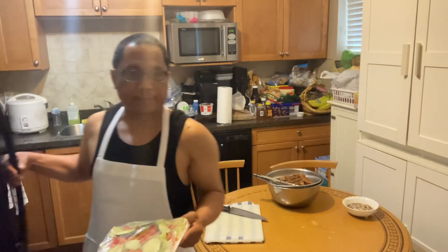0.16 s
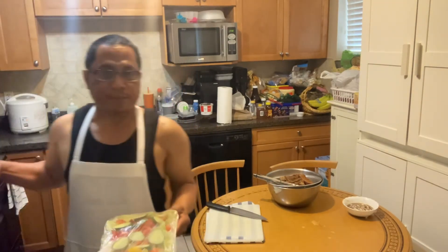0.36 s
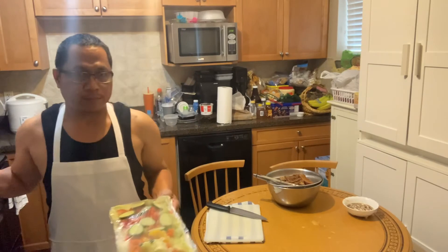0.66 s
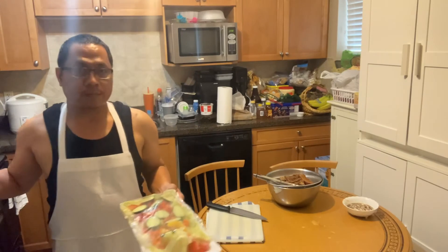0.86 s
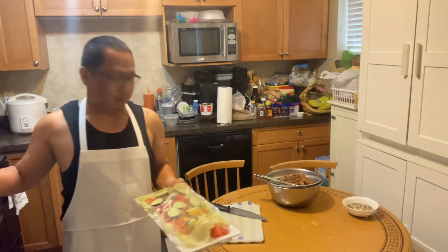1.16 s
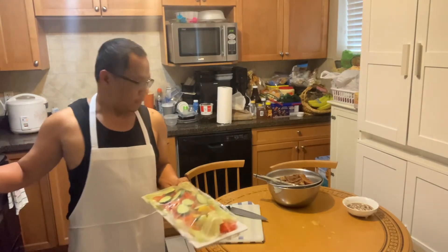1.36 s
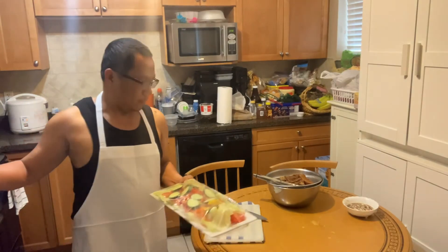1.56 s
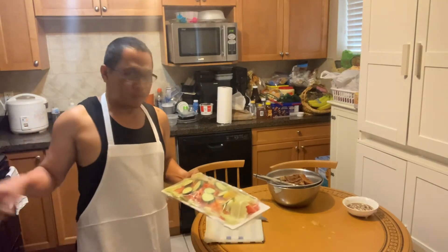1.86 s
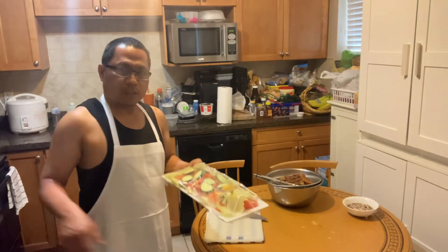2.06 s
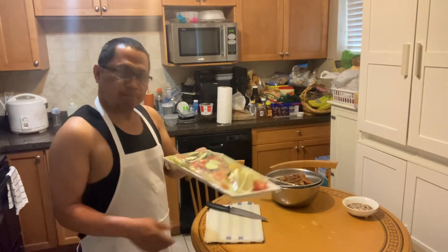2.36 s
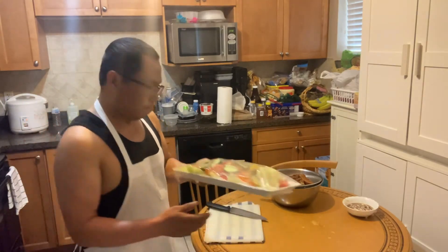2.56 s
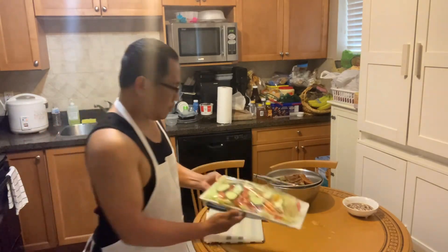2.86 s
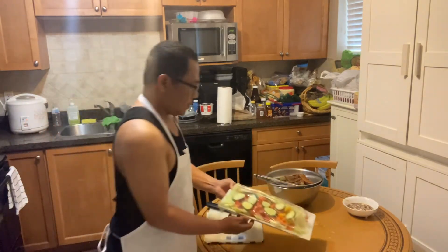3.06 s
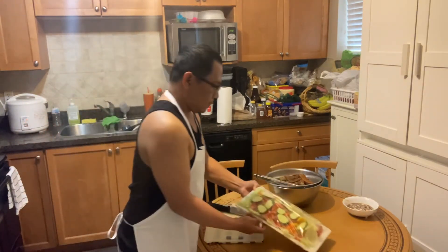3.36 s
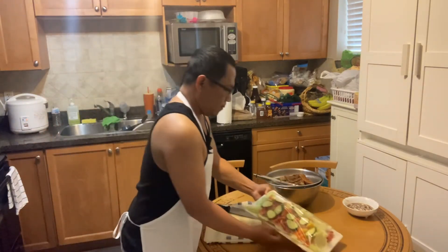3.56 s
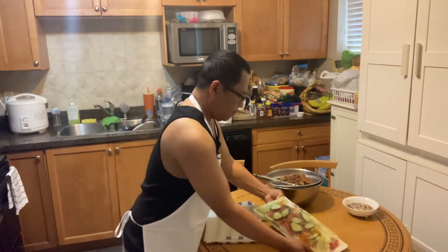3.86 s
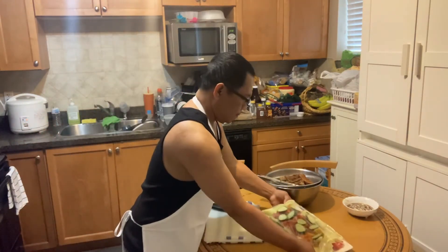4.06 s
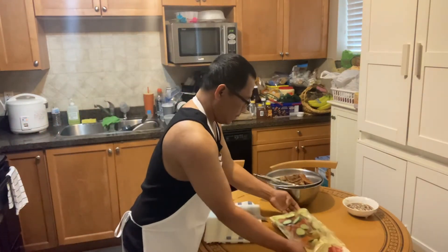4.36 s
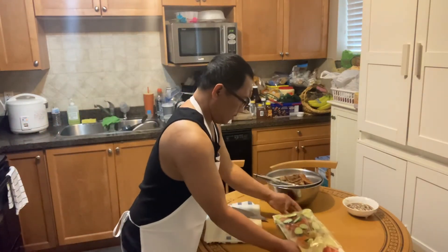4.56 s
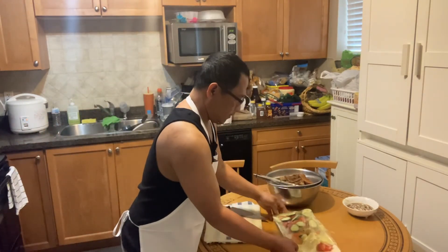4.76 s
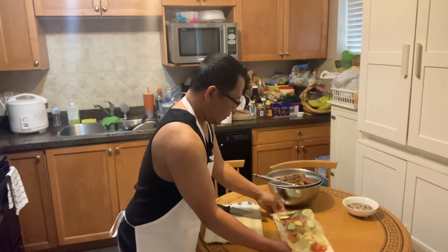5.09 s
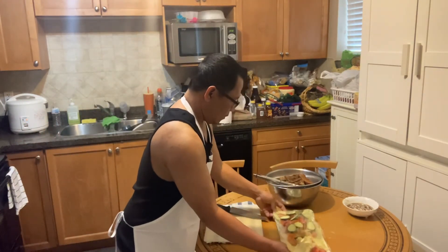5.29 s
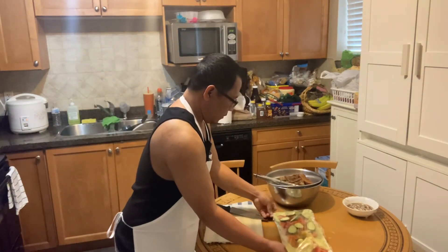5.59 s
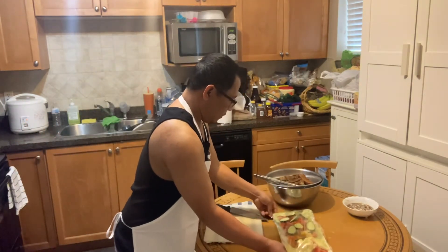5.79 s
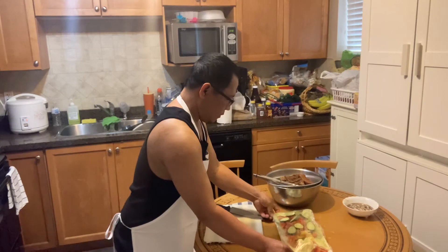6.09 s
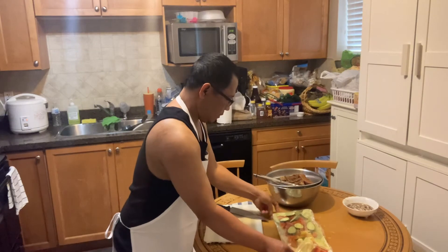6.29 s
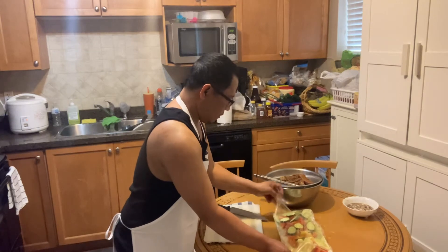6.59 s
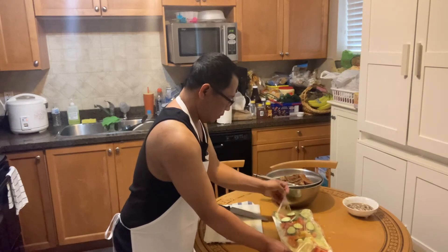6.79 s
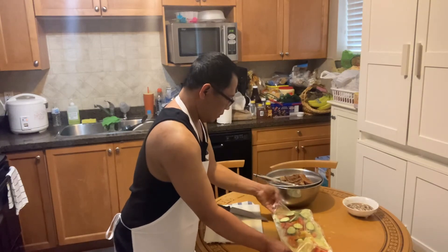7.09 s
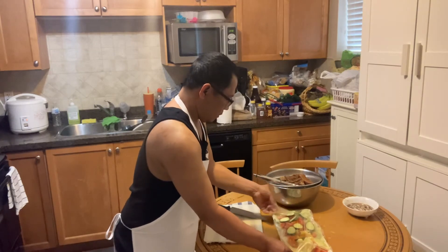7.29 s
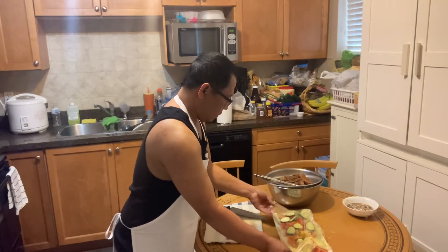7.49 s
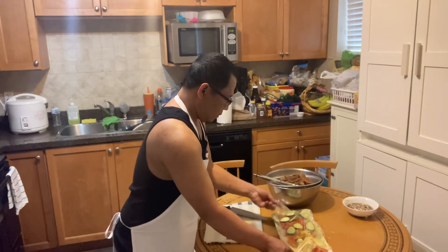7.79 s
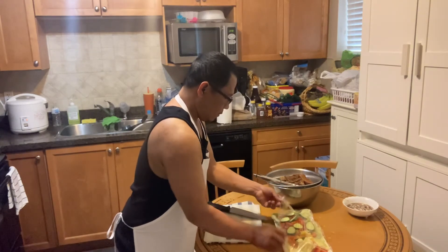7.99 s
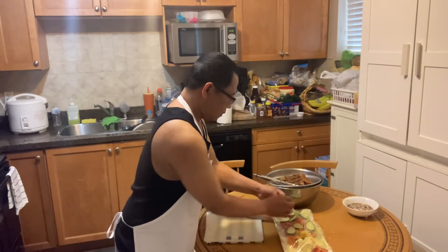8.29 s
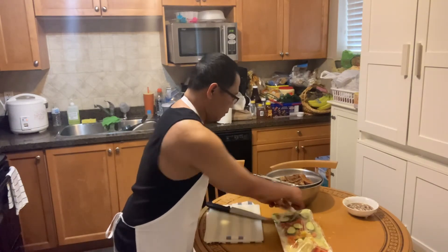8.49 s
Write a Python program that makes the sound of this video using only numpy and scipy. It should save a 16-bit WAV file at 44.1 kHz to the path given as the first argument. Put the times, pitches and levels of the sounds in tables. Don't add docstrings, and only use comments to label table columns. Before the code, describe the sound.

In a small kitchen with a humming fridge, a door thumps closed, a plate lands and drags on wood, and cling film crackles sharply.

```python
import sys
import numpy as np
from scipy import signal
from scipy.fft import rfft, irfft, next_fast_len
from scipy.io import wavfile

SR = 44100
rng = np.random.default_rng(int(sys.argv[2]) if len(sys.argv) > 2 else 0)


def magnitude_from_level(level_db):
    exponent = np.asarray(level_db, float) / 20
    return 10 ** exponent


def dump(signal):
    limited = np.clip(np.atleast_2d(signal).T, -1, 1)
    pcm = np.round(limited * 32767).astype(np.int16)
    wavfile.write(sys.argv[1], SR, pcm)


N = 381024
COARSE_S = np.arange(0, N + 40, 40) / SR

# frequency in Hz, left-right correlation from 0 to 1.
LIKENESS = [(40, 0.96), (130, 1), (290, 0.83), (640, 0.45), (1400, 0.22), (3000, 0.0096), (4200, 0.45),
            (8000, .1)]
TABLE_HZ = [145, 361, 415, 503, 603, 646, 746, 830, 1090, 1198, 1365, 1420, 1880, 2237, 2365, 2900, 3720]
# level in dB, t60 in s.
KNOCK_RING = [(-21, .4), (0, 0.39), (-12, 0.41), (-21.5, 0.81), (-12.5, 0.36), (-19, 0.5), (-11, 0.4),
              (-1, 0.1), (-12, 0.16), (0, 0.22), (-14, 0.3), (-9, 0.25), (-13, 0.14), (-30, 0.44),
              (-24, 0.31), (-35.5, .15), (-33, 0.27)]


def at_hz(points, hz):
    table = np.array(points)
    return np.interp(np.log(hz), np.log(table[:, 0]), table[:, 1])


def rms_one(x):
    return x / np.sqrt(np.mean(x ** 2) + 1e-20)


def smooth(coarse):
    return np.interp(np.arange(N) / SR, COARSE_S, coarse)


def drift(rate):
    r = np.exp(-80 * np.pi * rate / SR)
    white = rng.standard_normal(len(COARSE_S) + 2000)
    return rms_one(signal.lfilter([1], [1, -2 * r, r * r], white)[2000:])


def spread(mid_side, hz):
    alike = np.clip(at_hz(LIKENESS, hz), 0, 1)
    mid = np.sqrt((1 + alike) / 2) * mid_side[0]
    side = np.sqrt((1 - alike) / 2) * mid_side[1]
    return mid + side * [[1], [-1]]


def noise_bank():
    centres_hz = 35 * 2 ** np.arange(0, 9, .42)
    size = next_fast_len(N)
    white = rfft(rng.standard_normal((2, size)))
    bin_hz = np.arange(1, white.shape[1] + 1) * SR / size
    place = np.interp(np.log(bin_hz), np.log(centres_hz), range(len(centres_hz)))
    bank = []
    for k, hz in enumerate(centres_hz):
        weight = np.clip(1 - np.abs(place - k), 0, 1)
        bank.append((hz, spread(irfft(white * weight, size)[:, :N], hz)))
    return bank


def resonate(x, hz, width_hz):
    r = np.exp(-np.pi * width_hz / SR)
    return signal.lfilter([(1 - r * r) / 2, 0, (r * r - 1) / 2], [1, -2 * r * np.cos(2 * np.pi * hz / SR), r * r], x)


def ring(t, hz, t60, flutter_db, pace_s=.022):
    # frequency in Hz, left minus right in dB.
    lean = [(60, -2.5), (150, 0), (380, -4), (800, -1), (2400, 1)]
    left_right = np.array([[.5], [-.5]])
    alike = np.clip(at_hz(LIKENESS, hz), 0, 1)
    phase = rng.uniform(0, 2 * np.pi) + np.arccos(alike) * rng.choice([-1, 1]) * left_right
    knots = np.arange(46) * pace_s
    steady = min(1, hz / 550)
    one, other = rng.standard_normal((2, len(knots))) * flutter_db * steady
    other = alike * one + np.sqrt(1 - alike ** 2) * other
    waver = [np.interp(t, knots, magnitude_from_level(row)) for row in (one, other)]
    swell = 1 - np.exp(-t * hz / 1.3)
    decay = np.exp(-t * np.log(1000) / max(t60, .008))
    return np.sin(2 * np.pi * hz * t + phase) * waver * swell * magnitude_from_level(at_hz(lean, hz) * left_right) * decay


def blows(bank, events, tail, modes, tail_db, ring_db, rise_s, crack_db, length_s, flutter_db=5.5, crack_s=0.0011):
    # frequency in Hz, factor on t60.
    stretch = [(40, 2.6), (150, 1.31), (500, 1.123), (2000, 1.12), (6000, 1.1), (15000, 0.97)]
    damped_at_s = np.array([.51, 1.7, 3.73, 4.037, 4.27, 4.345, 4.455, 5.4, 5.74, 6.65])
    out, t = np.zeros((2, N + SR)), np.arange(round(length_s * SR)) / SR
    total_db = 10 * np.log10(sum(magnitude_from_level(2 * at_hz(tail, hz)) * hz / SR for hz, band in bank) + 1e-20)
    crack = 1 + magnitude_from_level(crack_db) * np.exp(-t / crack_s)
    for s, peak_db, t60, tilt_db, *ringing in events:
        start, at = rng.integers(0, N - SR), round(s * SR)
        gap_s = min([row[0] - s for row in events if row[0] > s] + [1])
        attack_s = gap_s if gap_s < .025 else rise_s
        attack = np.sin(np.pi / 2 * np.minimum(t / attack_s, 1)) ** 2
        sound = np.zeros((2, 1))
        for hz, band in bank:
            level_db = tail_db - total_db + at_hz(tail, hz) + tilt_db * np.log2(hz / 1000)
            dying = np.exp(-t * np.log(1000) / max(t60, .02) / at_hz(stretch, hz))
            sound = sound + magnitude_from_level(level_db) * dying * band[:, start:start + len(t)]
        sound = sound * crack
        if modes:
            free_s = min(stop for stop in damped_at_s if stop > s) - s
            held = np.maximum(t - free_s, 0) / 0.054
            for hz, mode_db, mode_t60 in modes:
                damped = np.exp(-np.log(1000) * held * min(1, 450 / hz))
                level_db = ring_db + ringing[0] + mode_db + tilt_db * np.log2(hz / 1000)
                sound += magnitude_from_level(level_db) * ring(t, hz, mode_t60, flutter_db) * damped
        out[:, at:at + len(t)] += sound * attack * magnitude_from_level(peak_db)
    return out[:, :N]


def motor(bank, hum_db, patchy_db):
    # frequency in Hz, level in dB per Hz.
    rumble = [(18, -43), (30, -14), (64, -8), (100, -29), (213, -7), (243, -12), (410, -20.5), (479, -18.5),
              (830, -24), (1260, -33.5), (1360, -30.5), (1720, -37), (2130, -42), (2360, -43),
              (15500, -74.5)]
    # frequency in Hz, bandwidth in Hz, level in dB.
    hum_modes = [(59.75, 7.8, -1), (129, 19, -8), (162, 17, -32), (214.5, 10, 3.5), (366.7, 27.4, -7.5)]
    wide = sum(magnitude_from_level(at_hz(rumble, hz)) * band[:, ::-1] for hz, band in bank)
    wide = wide * smooth(magnitude_from_level(patchy_db * drift(3.4)))
    white = rng.standard_normal((2, N))
    hums = 0
    for hz, width_hz, db in hum_modes:
        hums = hums + magnitude_from_level(db) * resonate(resonate(spread(white, hz), hz, width_hz), hz, width_hz)
    return magnitude_from_level(-54) * rms_one(rms_one(wide) + magnitude_from_level(hum_db) * rms_one(hums))


def strokes(rows):
    s, peak_db, swell_s, fade_s = np.transpose(rows)[:4, :, None]
    before = (s - COARSE_S) / np.maximum(swell_s, .002)
    after = (COARSE_S - s) / np.maximum(fade_s, .002)
    return magnitude_from_level(2 * (peak_db - 20 * np.maximum(before, after)))


def rubbing():
    # peak time in s, peak in dB, swell in s, fade in s, tilt in dB per
    cloth_strokes = [(0.001, -68, .01, 0.04, -5), (.4, -76, 0.11, -0.04, -3.5),
                     (.516, -64.5, .15, 0.06, -2), (.856, -64, 0.023, 0.25, -2),
                     (1.02, -77, 0.07, 7.5, -2.5), (2.47, -69.5, 0.034, .45, -0.5),
                     (2.648, -68, 0.31, -0.34, 7.5), (2.91, -73.5, .05, 0.7, -3),
                     (3.02, -74, 0.029, -7, -5), (3.15, -76, 0.19, 0.3, -8), (4.25, -65.5, .15, 0.35, -12),
                     (4.7, -72, 0.099, -0.7, -16), (6.385, -52, 0.11, 0.13, -6.5)]
    # peak time in s, peak in dB, swell in s, fade in s.
    film_strokes = [(3.25, -60.5, 0.009, 0.2), (3.35, -59.5, 0.23, .12), (3.66, -57.5, 0.04, 0.24),
                    (3.74, -59.5, 0.2, -0.45), (3.88, -55.5, .09, 0.18), (4.04, -55.5, .07, 0.2),
                    (4.19, -62, 0.048, 0.86), (4.29, -60.5, 0.072, -0.3), (4.53, -60, .06, -0.3),
                    (4.78, -64.5, 0.054, .4), (4.92, -53.5, 0.023, 0.15), (5.08, -60, 0.06, -0.05),
                    (5.3, -54, .14, 0.05), (5.52, -59, 0.71, 0.48), (6.04, -64, .04, 0.5),
                    (6.14, -61.5, .021, 1.14), (6.3, -60, 0.28, 0.1), (6.4, -48, 0.21, 0.18),
                    (6.6, -65, 0.39, 1), (7.13, -52.5, 0.0083, -0.1), (7.296, -55.5, 0.073, 0.18),
                    (7.46, -49, 0.27, 0.2), (8.0, -56.5, 0.088, 0.11), (8.27, -53.5, 0.009, -0.1),
                    (8.639, -60, 0.051, .1)]
    # time in s, level in dB.
    grip = [(3.1, -99), (3.5, -76), (4.7, -71.5), (4.73, -79.5), (5.15, -71), (5.9, -77.5), (6.1, -81.5),
            (6.65, -63.5), (6.85, -64), (7.11, -71.5), (7.19, -78), (7.55, -62), (7.93, -64.5), (8.22, -66),
            (8.3, -78.5), (8.37, -74), (8.57, -88)]
    cloth = strokes(cloth_strokes)
    grip_db = np.interp(COARSE_S, *np.transpose(grip))
    hiss_floor_db = -85
    film = strokes(film_strokes).sum(axis=0) + magnitude_from_level(2 * grip_db) + magnitude_from_level(2 * hiss_floor_db)
    film_tilt_db = -0.62 + 0.1932 * (10 * np.log10(film) + 60.5)
    power = film + cloth.sum(axis=0)
    tilt_db = (film * film_tilt_db + np.transpose(cloth_strokes)[-1] @ cloth) / power
    return 10 * np.log10(power), tilt_db


def rustle(bank, patchy_db, grain_db, grains_per_s):
    # frequency in Hz, level in dB per Hz.
    colour = [(410, -28), (700, -5.5), (2130, -4.5), (6740, -6), (8530, 1.5), (10100, -14), (11800, -4.5),
              (14000, -11.5), (16000, -9)]
    # frequency in Hz, bandwidth in Hz, level in dB.
    plate_modes = [(1330, 130, 2), (2155, 170, -2.5)]
    level_db, tilt_db = rubbing()
    clump_db, grain_spread_db = 3, 4
    born = rng.random(N) < smooth(grains_per_s * magnitude_from_level(clump_db * drift(6)) / SR)
    sizes = born * magnitude_from_level(grain_spread_db * np.minimum(rng.exponential(1, N), 3))
    grains = 1 + magnitude_from_level(grain_db) * signal.lfilter([1], [1, -np.exp(-1 / (0.0034 * SR))], sizes)
    plain = sum(magnitude_from_level(at_hz(colour, hz)) * band[:, :SR] for hz, band in bank if hz > 6000)
    out = 0
    for hz, band in bank:
        if hz > 600:
            band_db = level_db + at_hz(colour, hz) + tilt_db * np.log2(hz / 9000) + patchy_db * drift(5)
            out = out + smooth(magnitude_from_level(band_db)) * band
    out = out + sum(magnitude_from_level(db) * resonate(out, hz, width_hz) for hz, width_hz, db in plate_modes)
    return out / np.std(plain) * rms_one(grains)


def door_bumps(bank):
    # start in s, peak in dB, tail t60 in s, tilt in dB per octave, ring in dB.
    bumps = [
        (0.060, -27, 0.3, 0.5, -15),
        (.080, -8.5, 0.29, 0.5, 2),
    ]
    rebounds = [
        (.098, -11, .2, 1, 0),
        (.117, -16, .2, -1, 0),
    ]
    # frequency in Hz, level in dB, t60 in s.
    door_modes = [(50.7, -11, 0.86), (72.5, -3.5, 0.37), (100, -12, .2), (122, -10.5, 0.23), (158, -7, 0.2),
                  (213.5, -8.5, .29), (372, -26, 0.73), (504, -11, 0.25), (682, -10, 0.17),
                  (803, -9.5, 0.074), (902, 4, 0.065), (1055, 1, 0.11), (1125, -22, 0.14),
                  (1376, -16, 0.23), (1980, -54, 0.133), (4820, -41, 0.236)]
    # frequency in Hz, level in dB per Hz.
    tail = [(21, -48), (35, -5.5), (70, -10), (176, -7.5), (205, -9), (979, -8), (1640, -20), (8430, -39.5),
            (10100, -52), (11800, -48), (16000, -95)]
    out = blows(bank, bumps, tail, door_modes, tail_db=-6, ring_db=-7.5, rise_s=0.0045, crack_db=-6.5, length_s=0.76)
    out += blows([], rebounds, [], door_modes[2:], tail_db=0, ring_db=-7.5, rise_s=.003, crack_db=0, length_s=.4)
    return out


def landings():
    # (each: frequency in Hz, level in dB, t60 in s).
    contacts = [((3.632, -19, .2, 0, 0), [(431, -6, .2), (635, -6, .25), (730, -10, .25), (829, -7, .12),
                (1174, -12, .2), (1529, -16, .12), (1750, -23, .2), (2218, -21, .25), (2400, -24, .2)]),
                ((3.874, -16, .2, 0, 0), [(651, -5, .14), (872, -16, .6), (1174, -11, .5), (1895, -13, .22),
                (2207, -23, .22), (2772, -28, .3)]), ((4.375, -17, .2, 0, 0), [(365, -8, .2),
                (156, -6, .12), (215, -10, .12), (705, -12, .15), (872, -10, .14), (1087, -13, .12),
                (1340, -17, .25), (1534, -27, .25), (2546, -36, .3)]), ((5.297, -10, .2, 0, 0),
                [(326, -14, .3), (506, -10, .3), (571, -7, .2), (950, -8, .12), (1135, -9, .15),
                (1717, -26, .3), (2191, -24, .2), (3100, -36, .3), (4300, -40, .3), (4900, -41, .3)]),
                ((4.299, -28, .2, 0, 0), [(361, 0, .4), (720, -8, .2), (1000, -12, .15), (1400, -14, .2)]),
                ((.446, -25, .2, 0, 0), [(328, 0, .4), (520, -4, .12), (716, 2, .13), (950, -6, .1),
                (1125, -9, .2), (1303, -12, .2), (1965, -17, .13), (2767, -29, .12), (3400, -24, .03)])]
    out = np.zeros((2, N))
    for contact, modes in contacts:
        out += blows([], [contact], [], modes, tail_db=0, ring_db=-6, rise_s=.005, crack_db=0, length_s=.4,
                     flutter_db=4.0)
    return out


def shelf_knock(bank):
    # start in s, peak in dB, tail t60 in s, tilt in dB per octave, ring in dB.
    jar = [
        (.447, -27.5, 0.27, 0.36, -5.5),
    ]
    # frequency in Hz, level in dB per Hz.
    tail = [(59, -40), (100, -11), (346, -4), (458, -9), (1330, -12.5), (2140, -26), (5950, -43),
            (9070, -57), (10200, -59), (12000, -57), (15600, -73), (22000, -120)]
    modes = [(hz, *mode) for hz, mode in zip(TABLE_HZ, KNOCK_RING)]
    return blows(bank, jar, tail, modes, tail_db=-6, ring_db=-12, rise_s=0.002, crack_db=3, length_s=.3)


def shelf_rattles(bank):
    # start in s, peak in dB, tail t60 in s, tilt in dB per octave.
    rattles = [(0.661, -53.5, 0.55, 1.5), (0.712, -37, 0.31, -1), (1.1453, -52, 0.56, -3.5),
               (1.8846, -51, 0.25, -4.5), (2.583, -54, 0.39, 0.5)]
    # frequency in Hz, level in dB per Hz.
    tail = [(410, -37), (700, -8), (1000, -5), (1730, -5), (3920, -10), (9020, -35.5), (9800, -54),
            (12000, -46), (15600, -76), (22000, -120)]
    return blows(bank, rattles, tail, [], tail_db=-6.0, ring_db=0, rise_s=0.016, crack_db=-4.5, length_s=.3)


def creases():
    # start in s, peak in dB, frequency in Hz, t60 in s.
    pops = [(1.378, -27, 5000, .02), (1.379, -30, 8500, .015), (1.386, -31, 8000, .012),
            (1.374, -44, 15000, .015), (5.671, -52, 1200, .05), (.725, -53, 3400, .06),
            (.728, -54, 2200, .06), (3.186, -60, 8500, .03), (3.25, -55, 5100, .035),
            (3.252, -57, 8300, .04), (3.254, -56, 3900, .05), (3.2515, -54, 1300, .05),
            (3.319, -51, 1400, .07), (3.33, -58, 2250, .1), (4.2, -60, 4100, .08), (4.195, -60, 2700, .05),
            (4.263, -55, 3700, .04), (6.139, -57, 2160, .08), (6.165, -60, 2260, .08),
            (6.192, -60, 2200, .1), (6.243, -56, 3800, .06), (6.341, -52, 4900, .06),
            (6.37, -50, 1570, .07), (6.374, -39, 3000, .008), (6.39, -53, 2200, .08),
            (6.399, -41, 7500, .008), (6.404, -41, 4800, .008), (6.637, -54, 2150, .05),
            (7.322, -48, 4800, .015), (7.321, -50, 1350, .03), (7.381, -50, 8500, .015),
            (7.384, -48, 4900, .015), (7.401, -48, 4200, .015), (7.402, -50, 7500, .015),
            (7.42, -47, 3800, .015), (7.423, -47, 8200, .02), (7.44, -50, 2000, .015),
            (7.4515, -46, 4600, .03), (7.453, -48, 9000, .015), (7.466, -50, 2200, .08),
            (7.991, -47, 4010, .06), (7.992, -50, 1200, .06), (8.098, -53, 1340, .07),
            (8.11, -55, 4500, .03), (8.17, -56, 7500, .02), (8.27, -50, 4500, .05), (8.271, -52, 8700, .04)]
    out, t = np.zeros((2, N + SR)), np.arange(SR // 10) / SR
    for s, peak_db, hz, t60 in pops:
        at = round(s * SR)
        out[:, at:at + len(t)] += magnitude_from_level(peak_db) * ring(t, hz, t60, flutter_db=3.0, pace_s=.004)
    return out[:, :N]


def film_snaps(bank):
    # start in s, peak in dB, tail t60 in s, lows against peak in dB.
    releases = [(0.8455, -38, 0.22, -7), (3.1864, -50, 0.16, -2.5), (3.249, -37.5, 0.24, -11.5),
                (3.3394, -41, 0.12, -11.5), (3.5159, -56, 0.22, -18.5), (4.5271, -45, 0.11, -13.5),
                (4.9157, -42, 0.22, -23), (5.0688, -50, 0.22, -25.5), (5.2085, -40.5, 0.17, -16),
                (5.4884, -44.5, 0.17, -18), (5.555, -58, 0.27, -26), (5.9973, -57.5, 0.18, -12),
                (6.845, -49, 0.22, -26.5), (7.1305, -43, 0.45, -14), (7.246, -43, 0.24, -17.5),
                (7.4507, -38, 0.16, -13), (7.5458, -19.5, 0.34, -13.5), (7.6067, -23, 0.18, -13),
                (7.6566, -23, 0.43, -12), (7.7185, -19, 0.37, -11.5), (7.7593, -25.5, 0.36, -12),
                (7.99, -29.5, 0.33, -13.5), (8.097, -34.5, 0.29, -11), (8.1963, -51, 0.28, -23.5),
                (8.27, -38.5, 0.32, -19.5), (8.3628, -51, 0.55, -22)]
    # frequency in Hz, level in dB per Hz.
    tail = [(240, -38.5), (400, -5.5), (1130, -3.5), (1330, -1.5), (1490, -6), (9040, -6), (10200, -29.5),
            (11800, -5.5), (16000, -13)]
    snaps = [(s, db, t60, -.4 * (low_db + 17)) for s, db, t60, low_db in releases]
    return blows(bank, snaps, tail, [], tail_db=-16, ring_db=0, rise_s=0.00055, crack_db=6.5, length_s=0.13,
                 crack_s=0.0036)


def door_shut(bank):
    # start in s, peak in dB, tail t60 in s, tilt in dB per octave, ring in dB.
    shuts = [
        (1.354, -44, .3, 1, -22),
        (1.372, -25.5, 0.26, 0.36, -8),
    ]
    # frequency in Hz, level in dB, t60 in s.
    cabinet_modes = [(47.2, -3, 0.4), (75.4, -15, 0.15), (355.4, -15, 0.19), (508, -21, .2),
                     (657, -14.5, 0.2)]
    # frequency in Hz, level in dB per Hz.
    tail = [(21, -37), (35, -4), (216, -19.5), (301, -22), (334, -16.5), (667, -21.5), (778, -27),
            (8650, -28), (10100, -32.5), (12400, -40), (16000, -75)]
    return blows(bank, shuts, tail, cabinet_modes, tail_db=5.5, ring_db=13, rise_s=0.006, crack_db=-11.5,
                 length_s=.45)


def plate_drags(bank):
    # start in s, peak in dB, tail t60 in s, tilt in dB per octave, ring in dB.
    drags = [(3.631, -22, 0.28, -1.5, -6.5), (3.874, -15.5, 0.2, 2, 1), (3.915, -23, 0.37, -1, -4),
             (3.97, -30, 0.3, -1.5, 3), (4.189, -54, 0.13, -4.5, 3), (4.227, -46, 0.93, 1, -9),
             (4.288, -36, 0.82, 2, 3.2), (4.375, -21, 0.25, 0, -6)]
    # level in dB, t60 in s.
    soft_ring = [(-6.5, 0.15), (1, 1.36), (-6.5, 0.54), (-17.5, 2.2), (-5, 0.28), (-3, 0.23), (-18, 0.089),
                 (-11, 0.43), (-25, 0.17), (-15, 0.34), (-17, 0.35), (-10, 0.11), (-16.5, 0.19),
                 (-27.5, 0.27), (-29, 0.2), (-29, 0.088), (-40, .2)]
    # frequency in Hz, level in dB per Hz.
    tail = [(35, -57), (60, -26), (160, -29), (300, -12.5), (600, -11.5), (1300, -20), (1650, -30),
            (2300, -34), (3000, -46), (4000, -52), (8000, -65.5), (17000, -78)]
    modes = [(hz, *mode) for hz, mode in zip(TABLE_HZ, soft_ring)]
    return blows(bank, drags, tail, modes, tail_db=-2.0, ring_db=-5, rise_s=0.006, crack_db=6, length_s=0.57)


def plate_knocks(bank):
    # start in s, peak in dB, tail t60 in s, tilt in dB per octave, ring in dB.
    knocks = [(5.282, -29, 0.3, -2, -9.5), (5.296, -9.5, 0.31, 1, 1), (5.67, -49, 0.23, 9, -6),
              (5.679, -60, 0.2, -12, 4.5), (6.608, -49.5, 0.29, -8, -11)]
    # frequency in Hz, level in dB per Hz.
    tail = [(35, -49.5), (60, -35.5), (262, -18), (356, -9.5), (446, -12.5), (744, -9), (1050, -16.5),
            (1220, -8), (1620, -23), (2300, -32), (3000, -42), (4500, -50), (5300, -55), (6000, -72),
            (8000, -72), (10400, -101), (17600, -120)]
    modes = [(hz, *mode) for hz, mode in zip(TABLE_HZ, KNOCK_RING)]
    return blows(bank, knocks, tail, modes, tail_db=-1, ring_db=-4, rise_s=0.008, crack_db=4, length_s=.45)


def scene():
    bank = noise_bank()
    hum = motor(bank, hum_db=-1.5, patchy_db=1.13)
    film = rustle(bank, patchy_db=2.0, grain_db=-12, grains_per_s=55) + creases() + film_snaps(bank)
    door = door_bumps(bank) + shelf_knock(bank) + shelf_rattles(bank) + door_shut(bank)
    plate = landings() + plate_drags(bank) + plate_knocks(bank)
    return hum + film + door + plate


def band_limit(x):
    return signal.sosfilt(signal.butter(12, 17120, fs=SR, output="sos"), x)


def record(dry):
    # frequency in Hz, left minus right in dB.
    balance = [(60, -1), (150, -4.5), (380, 0), (950, 1.5), (2380, 1.5), (5980, 3), (15000, -6.5)]
    mic_low_hz, mic_top_hz = 52, 15900
    shared_treble_hz, treble_blend_hz, treble_lag_s = 6390, 960, .00025
    weak_share = .3
    size = next_fast_len(N + 4096)
    hz = np.maximum(np.fft.rfftfreq(size, 1 / SR), 1)
    left, right = rfft(dry, size) * magnitude_from_level(at_hz(balance, hz) * np.array([[.5], [-.5]]))
    passed = (hz < mic_top_hz) / np.sqrt(1 + (mic_low_hz / hz) ** 8)
    shared = np.clip((hz - shared_treble_hz) / treble_blend_hz / 2 + .5, 0, 1)
    late = right * np.exp(-2j * np.pi * hz * treble_lag_s)
    left = np.sqrt(1 - shared) * left + np.sqrt(shared) * late
    turn = np.pi * hz * treble_lag_s
    comb = np.abs([np.cos(turn), np.sin(turn)])
    kept = 1 - shared * np.clip(2 - 2 * comb / weak_share, 0, 1)
    mid, side = kept * [left + right, left - right] / 2
    heard = irfft(np.array([mid + side, mid - side]) * passed, size)[:, :N]
    rounded = heard / (1 + np.abs(heard / .95) ** 4) ** .25
    return band_limit(rounded)


dry = scene()
out = record(dry)
dump(out)
```